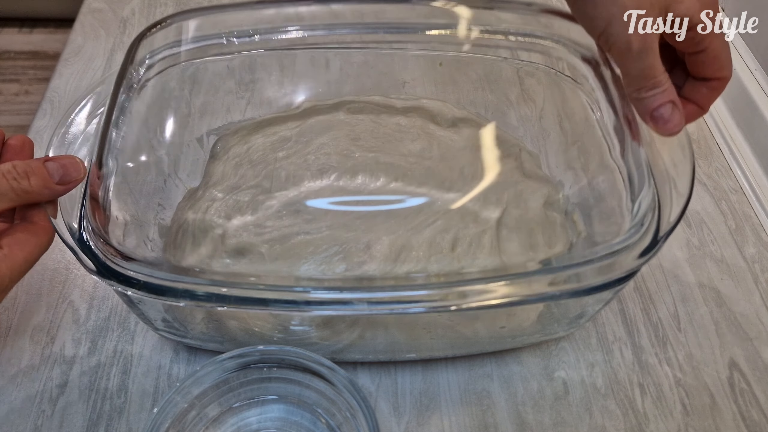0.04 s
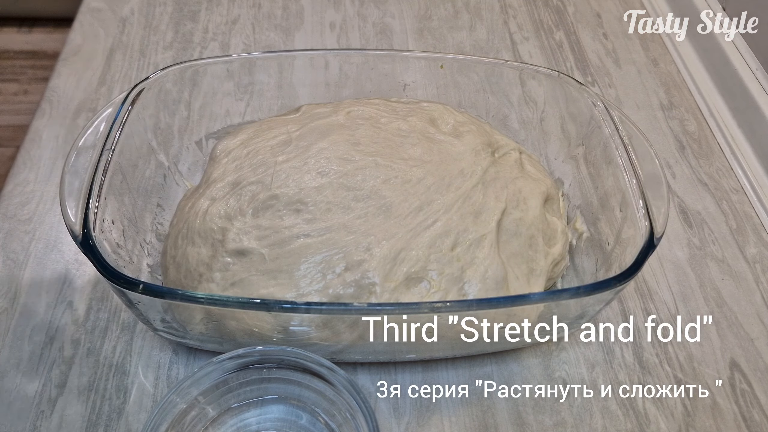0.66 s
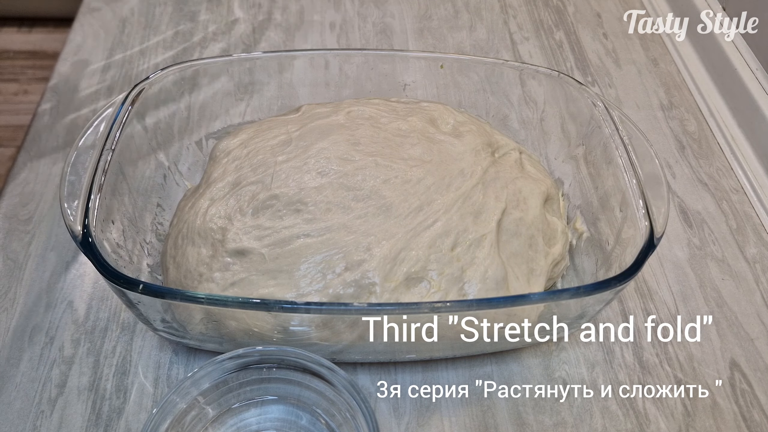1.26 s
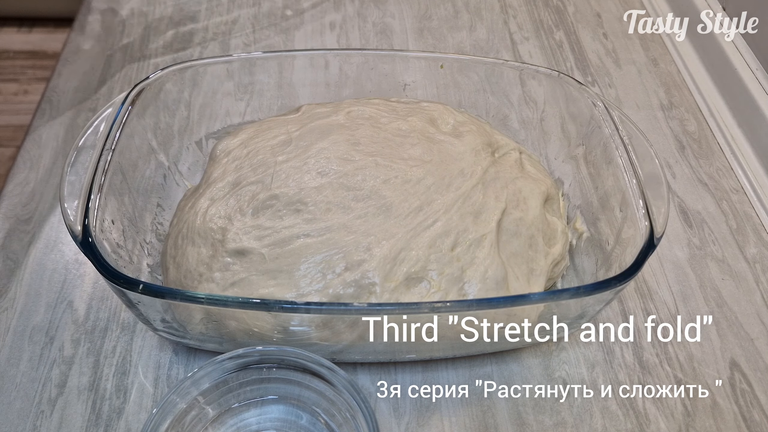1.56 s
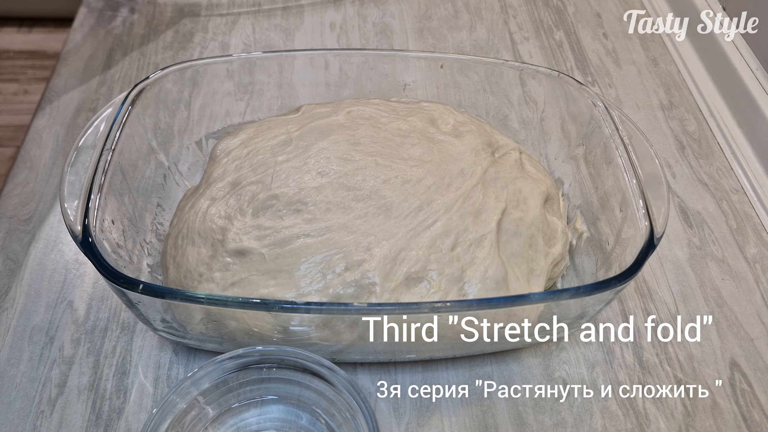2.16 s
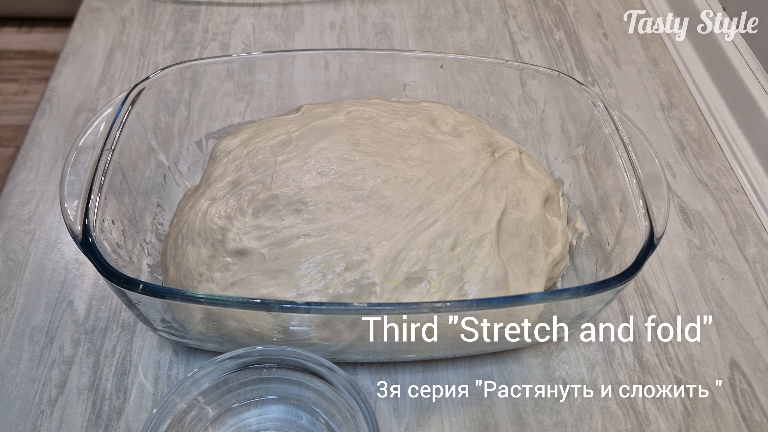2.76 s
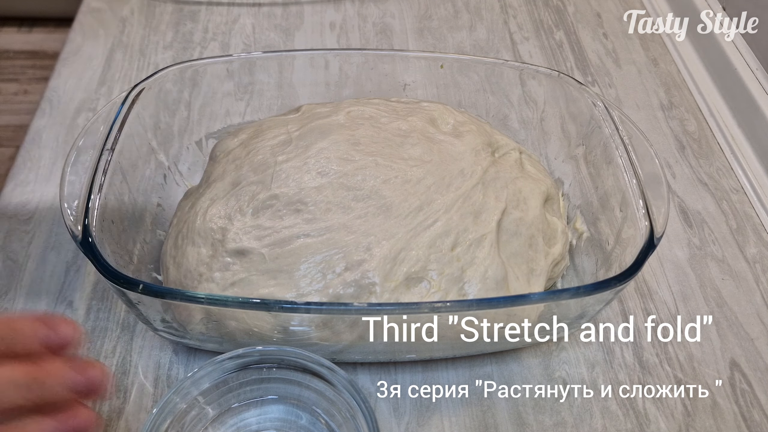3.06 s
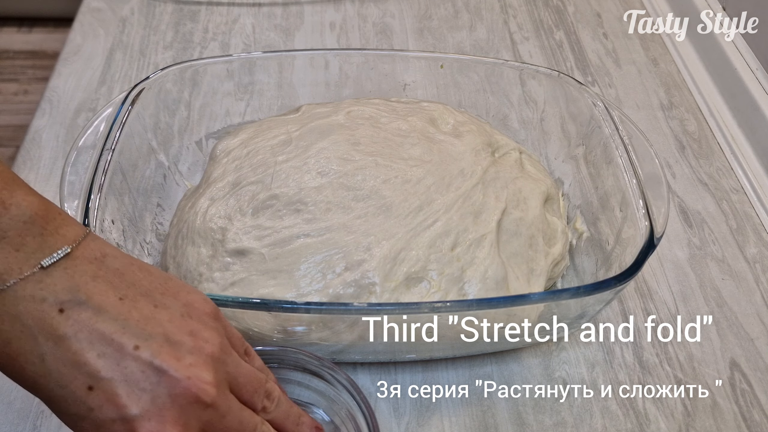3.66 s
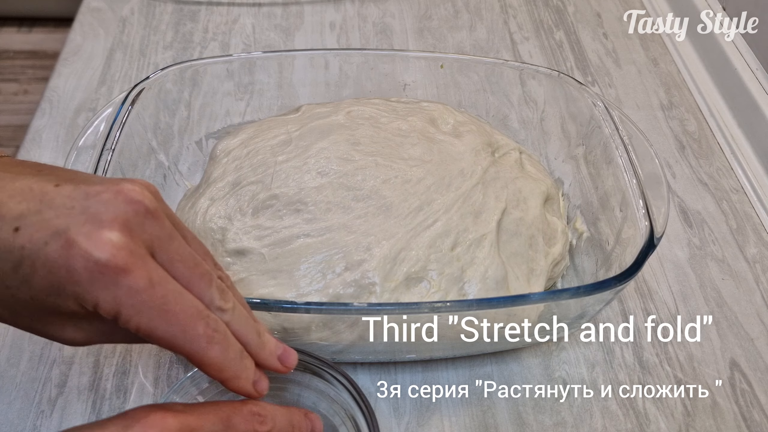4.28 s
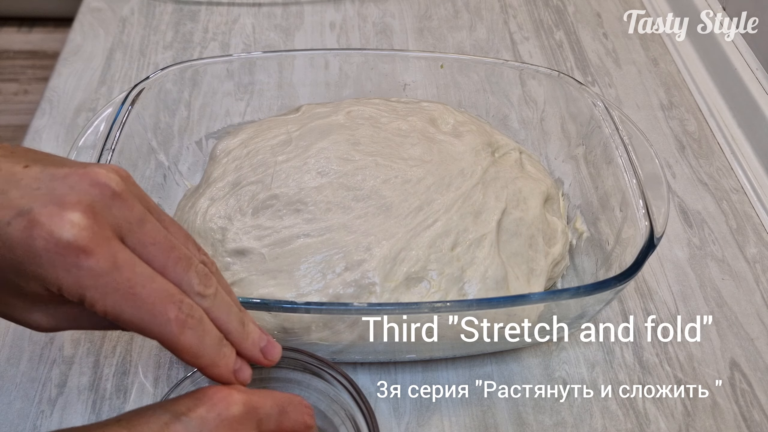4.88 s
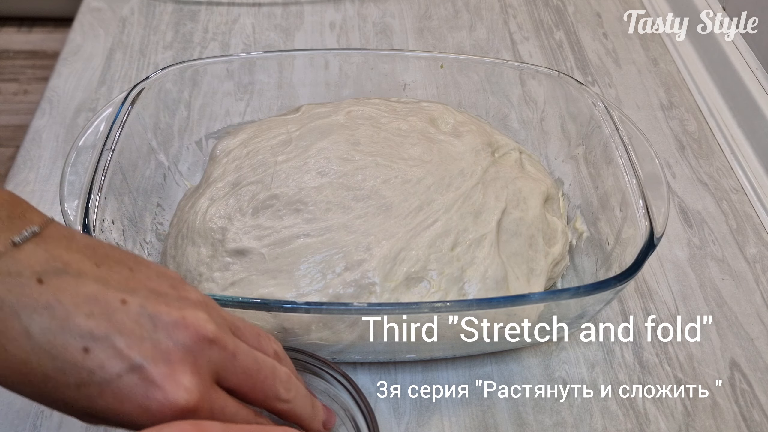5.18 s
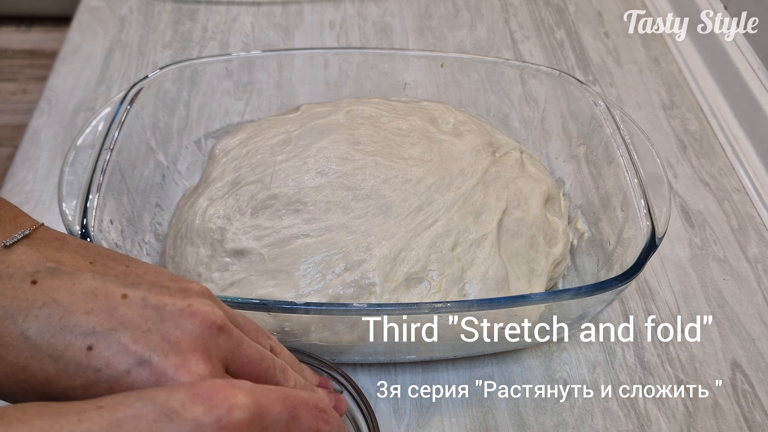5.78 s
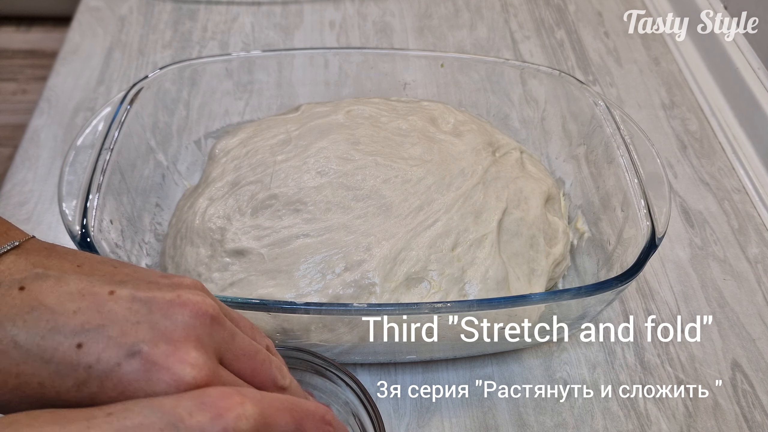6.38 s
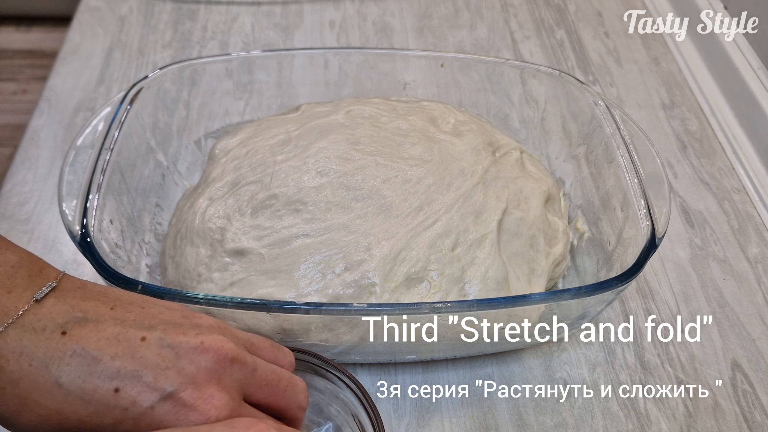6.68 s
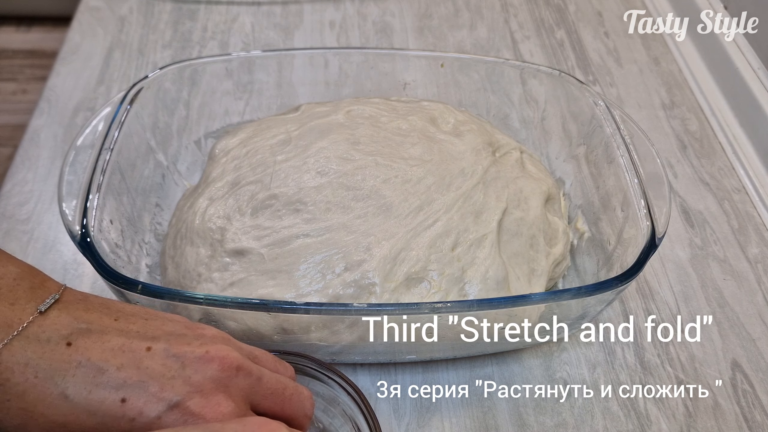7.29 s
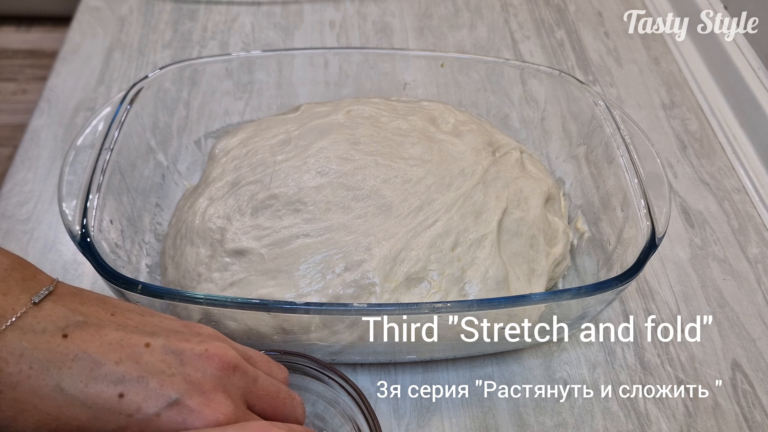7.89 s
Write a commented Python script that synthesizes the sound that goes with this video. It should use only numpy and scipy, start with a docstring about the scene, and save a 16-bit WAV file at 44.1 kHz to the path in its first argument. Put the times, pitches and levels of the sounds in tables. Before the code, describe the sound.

Right at the start, a glass lid knocks against a glass baking dish, a dull thud with a clear, short ring. A tiny rub follows at 0.7 seconds. At 1.7 seconds the lid lands on the dish with a loud, rattling clunk that briefly overloads the close stereo microphone. From 1.9 to 2.5 seconds the dish judders softly over the worktop, then bumps at 2.6. After a pause, light hollow glass taps come around 4.4 and 5.3 seconds. One bright clink rings out at 5.8, with two smaller ones just after. Softer taps continue from 6.7 to about 8 seconds, mixed with a faint recurring glassy ring and small brushing ticks. Underneath is the low, quiet appliance hum of a small kitchen, along with a faint distant motor that sinks in pitch and dies away from about 6 seconds.

```python
"""In a small kitchen, a glass lid knocks on a glass baking dish, then lands on it with a loud clunk.
The dish judders over the worktop and bumps. Each blow is a dull thud plus the ringing of the glass.
Lighter taps and one bright clink follow, with a faint recurring ring and small brushing sounds.
Underneath are a low hum and a distant motor that runs down.
The close stereo microphone overloads on the hardest blows."""
import sys
import numpy as np
from scipy import signal
from scipy.fft import rfft, irfft, next_fast_len
from scipy.io import wavfile

SR = 44100
rng = np.random.default_rng(int(sys.argv[2]) if len(sys.argv) > 2 else 0)


def int16_out(signal):
    """Quantize to a 16-bit WAV file."""
    q = np.round(np.clip(np.atleast_2d(signal).T, -1, 1) * 32767)
    wavfile.write(sys.argv[1], SR, q.astype(np.int16))


N = 354468
TIME = np.arange(N) / SR
RING_TIME = np.arange(int(1.2 * SR)) / SR  # the clock of a single blow, in seconds

# A colour says how strong a sound is from bass to treble. Columns: pitch_hz, level_db
AIR_COLOUR = [(20, -11), (50, -7.5), (80, -10.5), (135, -5), (180, -10), (240, -18), (400, -22.5),
              (650, -17), (950, -25.5), (1500, -26), (4000, -36), (7400, -41), (9000, -47.5), (15000, -51)]  # the still air of the room
LIGHT_TAP_COLOUR = [(60, -40), (150, -14.5), (280, -7.5), (430, -8), (560, 3.5), (720, 5.5), (900, -9.5),
                    (1250, -8), (2000, -6), (2900, -16), (4700, -1.5), (6000, -20), (8000, -15.5),
                    (9500, -43)]  # a light tap on glass
RIM_COLOUR = [(40, -42), (80, -13.5), (130, 4.5), (270, 4.5), (480, -1), (700, 2.5), (1100, -3.5),
              (1750, 0), (2300, -2), (3700, -6.5), (5200, -12), (5900, -23), (8000, -29), (12000, -40)]  # the lid's rim hitting the dish
HEAVY_KNOCK_COLOUR = [(25, -48.5), (55, -25.5), (95, -5), (200, -3.5), (400, -6.5), (700, 0), (1050, -0.5),
                      (1700, -8.5), (2200, -11.5), (3600, -14.5), (5500, -18), (7800, -16.5), (9500, -29),
                      (15000, -34)]  # lid, dish and worktop shaking together

# A mode is one tone a thing rings with; it fades by 60 dB in fade_s. Columns: pitch_hz, level_db, fade_s
FAINT_RING_MODES = [(1844, 7.5, 0.31), (1830, -11.5, .3), (4285, -1, 0.19), (7450, -20.5, 0.58)]  # the faint glassy ring
TAPPED_GLASS_MODES = [(675, 0, 0.23), (1049, -6.5, 0.35), (1266, -2.5, 0.43), (1862, 0, 0.32),
                      (1852, 4, 0.19), (2134, -16, 0.61), (2124, 4.5, 0.13), (2573, -8, 0.29),
                      (3300, -12, .23), (3355, -13, 0.17), (4340, 0.5, 0.16), (4300, -3.5, .26),
                      (4530, -12, .3), (4720, -13, .32), (4640, -9, 0.347), (4716, -3, 0.39),
                      (4870, -4.5, .26), (7260, -18.5, 0.44), (7525, -8.5, 0.47), (8070, -18.5, 0.24),
                      (11200, -14, 0.18), (11980, -20.5, 0.17)]  # the bright part of a tap
LOW_HOLLOW_MODES = [(542.7, -6.5, .18), (567, -1.5, 0.23), (656.4, -18, 0.12), (652.8, 7, .14),
                    (698.4, -0.5, 0.17), (1175, -10, 0.12)]  # the hollow part of a tap
SINGING_MODES = [(1620, -31.5, .25), (1800, -2.5, 0.26), (2560, -14, 0.17), (2760, -7.5, 0.15),
                 (3960, -13, 0.12), (5040, -12.5, 0.1)]  # the dish as it slides
GLASS_LID_MODES = [(135.5, -6, 0.07), (281, -4, 0.15), (405, -4, .22), (681, -5, 0.38), (806, -8, 0.21),
                   (980, -13.5, 0.27), (1278, -5, 0.45), (1332, -6.5, 0.46), (1700, 2, 0.26),
                   (1748, -1, 0.38), (1830, -14, 0.21), (2160, -12.5, .3), (2574, -14, 0.46),
                   (2616, -10.5, 0.44), (3033, -9.5, 0.4), (3606, -8, 0.42), (3760, -11, 0.12),
                   (4560, -10, 0.21), (3880, -10, 0.25), (4850, -13.5, 0.23), (5055, -10, 0.4),
                   (6600, -28, 0.23), (7360, -24.5, 0.28)]  # the struck lid
GLASS_DISH_MODES = [(109.7, -5.5, .3), (208, -12, 0.36), (303.6, -4, 0.44), (357.7, -9.5, 0.56),
                    (385.5, 5, 0.23), (538, -7, 0.5), (553, 10.5, 0.27), (780, 0.5, 0.29),
                    (828, -13.5, 0.3), (950, -10, 0.25), (1071, 1, .3), (1247, -8, 0.37), (1704, -3, 0.25),
                    (3161, -10.5, 0.5)]  # the struck dish

# The tones of the appliance hum. Columns: pitch_hz, level_db
HUM_TONES = [(49.3, -65), (100, -76.5), (149.5, -69.5), (199, -78.5), (393, -89), (632, -87.5), (742, -89),
             (1435, -90.5)]
# Small rubs and ticks. Columns: start_s, level_db, pitch_hz, width_hz, length_s
RUBS = [(0.711, -63.5, 2400, 1800, 0.033), (0.718, -63.5, 1004, 3.6, 0.058),
        (2.779, -68.5, 3330, 2400, 0.06), (5.776, -50, 6270, 1600, 0.004),
        (5.933, -44.5, 5800, 1000, 0.004), (6.886, -82.5, 8500, 1100, 0.014),
        (7.455, -72.5, 6010, 1800, 0.0081), (7.714, -59, 2790, 39, 0.019),
        (7.845, -55.5, 2800, 900, 0.0037)]
# Swells of the faint ring. Columns: start_s, level_db
RING_SWELLS = [(3.6, -74), (5.169, -53), (5.758, -46), (6.443, -54), (7.027, -57.5), (7.653, -61)]
# Light taps and one bright clink. Treble is dulled above contact_hz; "spot" is the place touched.
# Columns: start_s, level_db, contact_hz, glass_db, hollow_db, spot_hz, spot_db
GLASS_TAPS = [(4.324, -37.5, 992, -28, -13.5, 930, -15.5), (4.329, -29, 940, -25.5, -6, 956, -2.5),
              (4.452, -35, 905, -21, 2, 600, -14), (4.67, -64.5, 792, -6, 0.5, 698, -12),
              (5.205, -54.5, 576, -11, 0, 335, 2.5), (5.313, -42.5, 755, -20, -3.5, 390, -11),
              (5.413, -35.5, 965, -16.5, 3, 596, -15.5), (5.8313, -12, 5270, -3.5, -16.5, 1180, -12),
              (5.837, -14.5, 1840, -5, -17, 320, -16), (6.027, -30, 700, 0, -7.5, 626, -10.5),
              (6.087, -29.5, 1850, -2.5, 1.5, 1180, -10.5), (6.696, -41, 1040, -21, 3.5, 830, -9.5),
              (6.75, -39, 1045, -16, 1, 710, -7.5), (7.139, -51, 729, -14.5, -2, 328.5, -3),
              (7.314, -54.5, 795, -18.5, 3, 381, 3.5), (7.703, -56.5, 922, -13.5, -1.5, 350, -10),
              (7.922, -41.5, 920, -19, 1.5, 513, -7.5)]
# Pushes that slide the dish. Columns: start_s, length_s, rumble_db, singing_db
DISH_PUSHES = [(1.908, 0.17, -45, -65.5), (2.144, 0.21, -49.5, -61.5), (2.443, 0.045, -40.5, -76.5)]
# The lid's rim strikes the dish; pan is left minus right.
# Columns: start_s, level_db, contact_hz, ring_db, pan_db
RIM_HITS = [(0.001, -10, 6021, -5.5, 6), (0.008, -9, 4535, -4.5, 0), (0.017, -24, 3500, 4.5, 0.5)]
# The lid lands and the dish bumps the worktop.
# Columns: start_s, level_db, contact_hz, lid_db, dish_db, bass_db, pan_db
HEAVY_KNOCKS = [(1.697, -2, 3390, -18, -8, 0, 1), (1.702, -6.5, 1229, -9.5, -12, 7.5, 1),
                (1.7062, -9.5, 2000, -8, -10, -8, 2), (1.772, -9, 1350, -2.5, -4.5, -13, 3),
                (2.278, -28, 1020, -36.5, 1, 13, -1), (2.338, -37, 980, -12.5, 0.5, 15.5, 1),
                (2.572, -11, 694, -11, -4.5, -2, 3)]


def gain(db):
    """Turn decibels into a number to multiply by."""
    return 10 ** (np.asarray(db) / 20)


def unit(x):
    """Scale a sound so its average strength (rms) is 1."""
    return x / np.sqrt(np.mean(x ** 2))


def fade(fade_s):
    """A curve that dies away, 60 dB down after fade_s."""
    return np.exp(-np.log(1000) * RING_TIME / fade_s)


def lowpass(x, hz, order=2):
    """Dull the sound above hz; a higher order cuts more steeply."""
    return signal.sosfilt(signal.butter(order, min(hz, SR / 2 - 100), fs=SR, output="sos"), x)


def resonate(x, hz, width_hz):
    """Keep one band of the sound, centred on hz."""
    return signal.lfilter(*signal.iirpeak(min(hz, SR / 3), hz / width_hz, fs=SR), x)


def colour(x, points):
    """Shape bass and treble with a colour table; white noise keeps its power."""
    size = 2 * next_fast_len(x.shape[1] // 2 + 1)
    hz, db = np.transpose(points)
    log_hz = np.log(np.fft.rfftfreq(size, 1 / SR) + 1)
    curve = unit(gain(np.interp(log_hz, np.log(hz), db)))
    # Fold the filter in time so that nothing sounds before the blow.
    cepstrum = irfft(np.log(curve))
    cepstrum[1:size // 2] *= 2
    cepstrum[size // 2 + 1:] = 0
    return irfft(rfft(x, size) * np.exp(rfft(cepstrum)))[:, :x.shape[1]]


def stereo_noise(count, split_hz, opposed=0.2):
    """White noise, alike left and right in the bass and slightly opposed well above split_hz."""
    mid, side = rfft(rng.standard_normal((2, count)))
    bass = 1 / (1 + (np.fft.rfftfreq(count, 1 / SR) / split_hz) ** 3)
    alike = np.clip(bass - opposed * (1 - bass), -1, 1)
    shared = mid * np.sqrt((1 + alike) / 2)
    mirrored = side * np.sqrt((1 - alike) / 2) * np.array([[1], [-1]])
    return irfft(shared + mirrored, count)


def add(out, start_s, sound, pan_db=0, shade_hz=450):
    """Mix a sound in; the bass bends round the microphone, so only the treble leans to one side."""
    start = int(np.clip(start_s * SR, 0, N - 1))
    part = sound[:, :N - start]
    bass = lowpass(part, shade_hz, order=1)
    out[:, start:start + part.shape[1]] += bass + (part - bass) * gain([[pan_db / 2], [-pan_db / 2]])


def ring(modes, wander=0.6, wander_s=0.016, split_hz=900, spread_rad=0.9):
    """Fading tones: wall echoes make them waver, and high ones reach left and right out of step."""
    out = np.zeros((2, len(RING_TIME)))
    for hz, db, fade_s in modes:
        t = RING_TIME[:int(1.2 * fade_s * SR)]
        echoes = rng.standard_normal((2, 100, 2)) @ [1, 1j]  # random strength and phase
        lags = rng.choice([-1, 1]) * min(hz / split_hz, 1) ** 1.5 * spread_rad * np.array([1, -1])
        tone = gain(db) * np.exp((2j * np.pi * hz - np.log(1000) / fade_s) * t)
        for ear in range(2):
            echo = echoes[ear if hz > split_hz else 0]
            reflected = np.interp(t / wander_s, np.arange(len(echo)), echo)
            paths = np.exp(1j * lags[ear]) + wander * np.minimum(t / 0.005, 1) * reflected
            out[ear, :len(t)] += np.imag(tone * paths)
    return out * (1 - np.exp(-RING_TIME / 0.0005))


def overtones(points, spacing_hz, fade_s):
    """The many weak high tones of thick glass, scattered at random over the treble."""
    hz = np.fft.rfftfreq(len(RING_TIME), 1 / SR)
    present = (rng.random(len(hz)) < hz[1] / spacing_hz) & (hz > 1100) & (hz < 8500)
    phases = np.exp(2j * np.pi * rng.random((2, len(hz))))
    tones = unit(irfft(present * phases, len(RING_TIME)))
    return colour(tones * fade(fade_s), points)


def thud(points, fade_s, room_db, room_s, split_hz):
    """A short noisy shake, then the kitchen's echo, whose treble dies first."""
    near, far = (stereo_noise(len(RING_TIME), split_hz) for _ in range(2))
    low = lowpass(far, 1200, order=1)
    high = lowpass(far - low, 7700)
    room = (low * fade(room_s) + high * fade(0.37 * room_s)) * (1 - fade(0.092))
    return colour(near * fade(fade_s) + gain(room_db) * room, points)


def wavering(hz, depth, rate_hz):
    """A tone whose level and phase wander a little."""
    moments = np.arange(0, N / SR + 1, 1 / rate_hz)
    swell, drift = (np.interp(TIME, moments, c) for c in rng.standard_normal((len(moments), 2)).T)
    return unit((1 + depth * swell) * np.sin(2 * np.pi * hz * TIME + 2 * depth * drift))


def kitchen():
    """Appliances hum over the quiet air of the room."""
    hum = sum(gain(db) * wavering(hz, depth=0.07, rate_hz=3) for hz, db in HUM_TONES)
    air = gain(-66.5) * colour(stereo_noise(N, split_hz=180), AIR_COLOUR)
    return hum + air


def motor(pitch_hz=127.5, beat_s=4.6, lull_s=3.85, off_s=6.15, fall_hz_per_s=38, fall_db_per_s=33):
    """A distant motor drones with a slow beat; once switched off, it sinks in pitch and dies away."""
    coasting_s = np.maximum(TIME - off_s, 0)
    phase = 2 * np.pi * np.cumsum(pitch_hz - fall_hz_per_s * coasting_s) / SR
    beat = 2 * np.pi * (TIME - lull_s) / beat_s
    drone = np.sin(phase) - 0.95 * np.sin(phase + beat)  # two close tones nearly cancel once a beat
    return gain(-64 - fall_db_per_s * coasting_s) * drone


def brushes():
    """Handling makes light rubs and ticks: bands of noise that quickly rise and fall."""
    out = np.zeros((2, N))
    for start_s, db, hz, width_hz, length_s in RUBS:
        band = resonate(stereo_noise(len(RING_TIME), 1200), hz, width_hz)
        rub = unit(lowpass(band, 7740, order=6))
        age = 2 * RING_TIME / length_s
        add(out, start_s, gain(db) * rub * age * np.exp(1 - age))
    return out


def faint_ring(rise_s=0.027):
    """A faint glassy ring keeps coming back, swelling without a click and dying away."""
    out = np.zeros((2, N))
    rise = 1 - np.exp(-(RING_TIME / rise_s) ** 2)
    for start_s, db in RING_SWELLS:
        add(out, start_s, gain(db - 0.5) * ring(FAINT_RING_MODES, wander=0.65) * rise, pan_db=-3)
    return out


def taps(build_s=0.0017):
    """Soft taps wake mostly the low, hollow tones; a hard one makes the glass clink."""
    out = np.zeros((2, N))
    upper = overtones(LIGHT_TAP_COLOUR, spacing_hz=110, fade_s=0.33)
    glass = gain(-13) * ring(TAPPED_GLASS_MODES, wander=0.35) + gain(-16.5) * upper
    hollow = gain(-4) * ring(LOW_HOLLOW_MODES) * (1 - np.exp(-RING_TIME / build_s))
    for start_s, db, contact_hz, glass_db, hollow_db, spot_hz, spot_db in GLASS_TAPS:
        body = thud(LIGHT_TAP_COLOUR, fade_s=0.084, room_db=-15, room_s=0.52, split_hz=405)
        body *= 1 - np.exp(-RING_TIME / 0.0012)
        spot = stereo_noise(len(RING_TIME), 800)
        for _ in range(2):
            spot = resonate(spot, spot_hz, 0.33 * spot_hz)
        knock = body + gain(hollow_db) * hollow + gain(spot_db) * unit(spot) * fade(0.15)
        dull = lowpass(knock, 2 * contact_hz, order=6)
        bright = gain(glass_db) * lowpass(glass, 2 * contact_hz, order=1)
        add(out, start_s, gain(db) * lowpass(dull + bright, contact_hz, order=1), pan_db=2.5)
    return out


def sliding_dish(slips_per_s=320, catch_s=0.03, catch_db=4, attack_s=0.04, release_s=0.074):
    """The pushed dish sticks and slips in uneven bunches that rumble, scrape and make the glass sing."""
    moments = np.arange(0, N / SR + 1, catch_s)
    grip = gain(catch_db * np.interp(TIME, moments, rng.standard_normal(N)[:len(moments)]))
    slips = (rng.random(N) < slips_per_s / SR) * rng.standard_normal(N) * grip
    body = thud(HEAVY_KNOCK_COLOUR, fade_s=0.054, room_db=-11, room_s=0.26, split_hz=430)
    # Every slip sets off these three short sounds.
    bump = lowpass(body + gain(-17) * ring(GLASS_DISH_MODES), 610)
    ping = ring(SINGING_MODES, wander=1.2)
    rasp = resonate(body, hz=3800, width_hz=3000)
    rumble, singing, scrape = (unit(signal.fftconvolve(slips[None], sound)[:, :N])
                               for sound in (bump, ping, rasp))
    treble = singing + gain(-5.5) * scrape
    out = np.zeros((2, N))
    for start_s, length_s, rumble_db, singing_db in DISH_PUSHES:
        press = np.clip((TIME - start_s) / attack_s, 0, 1)
        let_go = np.exp(-np.maximum(TIME - start_s - length_s, 0) / release_s)
        out += press * let_go * (gain(rumble_db) * rumble + gain(singing_db) * treble)
    return out


def rim_clinks():
    """Glass hits glass, and the free lid rings with many clear tones."""
    out = np.zeros((2, N))
    lid = gain(-11.5) * ring(GLASS_LID_MODES)
    lid += gain(-16.5) * overtones(RIM_COLOUR, spacing_hz=107.8, fade_s=0.35)
    for start_s, db, contact_hz, ring_db, pan_db in RIM_HITS:
        body = thud(RIM_COLOUR, fade_s=0.055, room_db=-18, room_s=0.53, split_hz=970)
        add(out, start_s, gain(db) * lowpass(body + gain(ring_db) * lid, contact_hz), pan_db)
    return out


def lid_and_dish():
    """Each blow shakes lid, dish and worktop; a softer contact lasts longer and sounds duller."""
    out = np.zeros((2, N))
    upper = overtones(HEAVY_KNOCK_COLOUR, spacing_hz=90, fade_s=0.36)
    lid = gain(-17.5) * ring(GLASS_LID_MODES) + gain(-11) * upper
    dish = gain(-12.5) * ring(GLASS_DISH_MODES)
    for start_s, db, contact_hz, lid_db, dish_db, bass_db, pan_db in HEAVY_KNOCKS:
        body = thud(HEAVY_KNOCK_COLOUR, fade_s=0.049, room_db=-14, room_s=0.51, split_hz=670)
        body += (gain(bass_db) - 1) * lowpass(body, 180, order=1)
        blow = lowpass(body + gain(lid_db) * lid + gain(dish_db) * dish, contact_hz)
        edge = gain(-25) * lowpass(body, 7500)  # a little of the hard glass edge always gets through
        snap = lowpass(stereo_noise(len(RING_TIME), 600), 4000, order=1) * fade(0.0025)
        crack = gain(1.1 * db - 17) * snap  # heard only on the hardest blows
        add(out, start_s, gain(db) * (blow - edge + crack), pan_db)
    return out


def scene():
    """Everything heard at the worktop."""
    glassware = rim_clinks() + lid_and_dish() + sliding_dish() + taps() + faint_ring()
    return glassware + brushes() + kitchen() + motor()


def record(dry, bottom_hz=30, top_hz=15700):
    """The recorder loses the deepest bass, clips the loudest peaks and cuts the highest treble."""
    thinned = signal.sosfilt(signal.butter(2, bottom_hz, "highpass", fs=SR, output="sos"), dry)
    clipped = np.clip(thinned, -1, 1)
    return signal.sosfilt(signal.ellip(8, 0.2, 70, top_hz, fs=SR, output="sos"), clipped)


dry = scene()
out = record(dry)
int16_out(out)
```